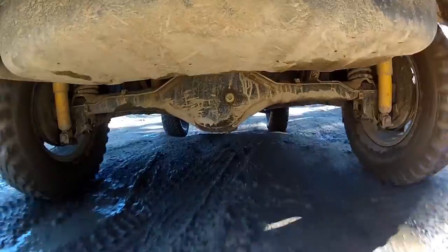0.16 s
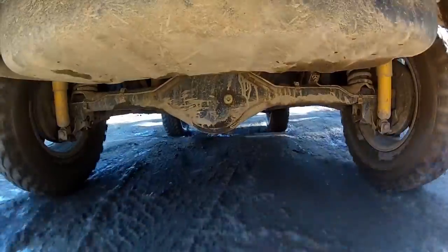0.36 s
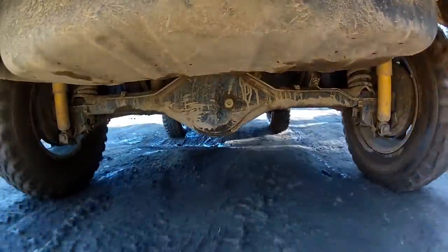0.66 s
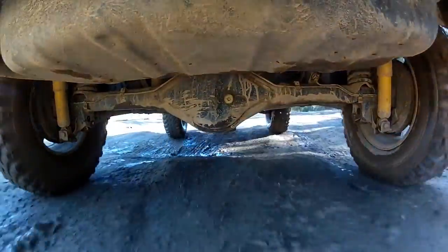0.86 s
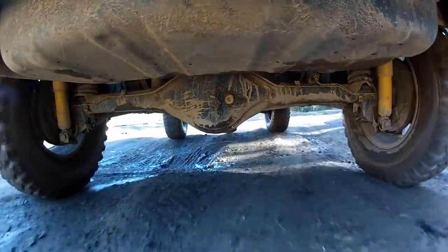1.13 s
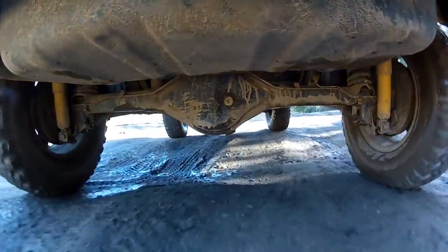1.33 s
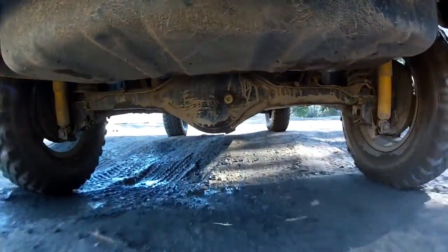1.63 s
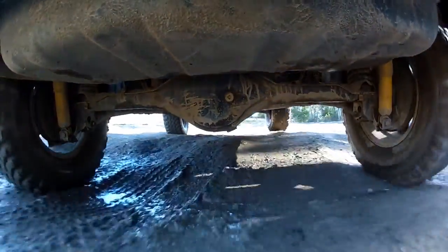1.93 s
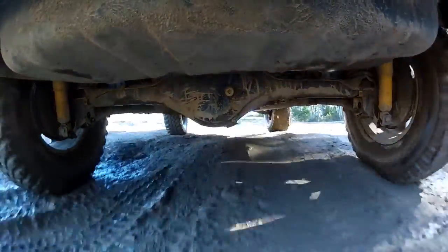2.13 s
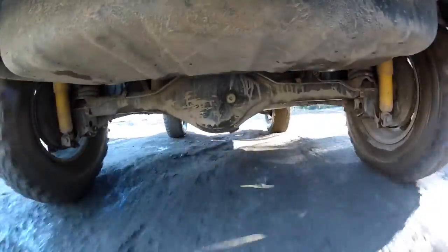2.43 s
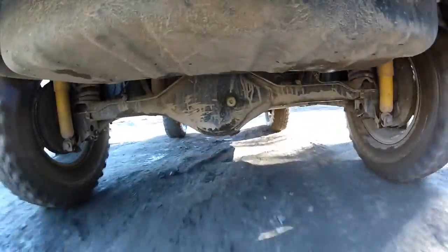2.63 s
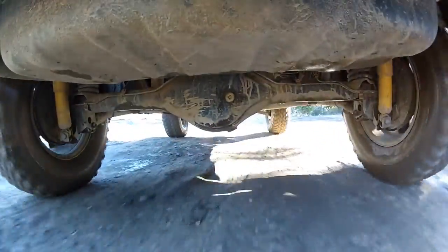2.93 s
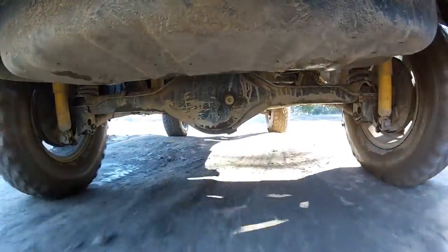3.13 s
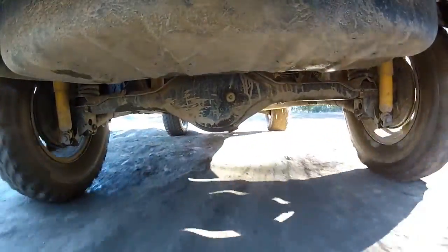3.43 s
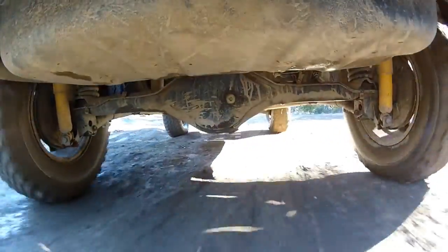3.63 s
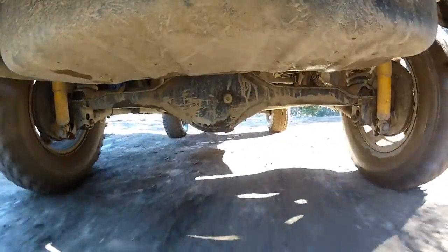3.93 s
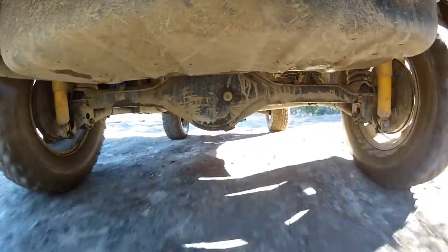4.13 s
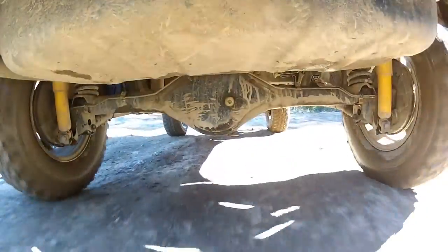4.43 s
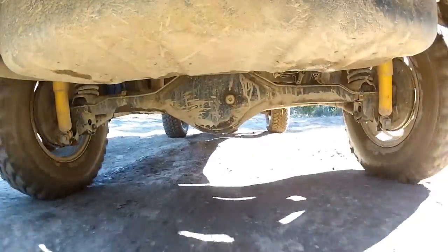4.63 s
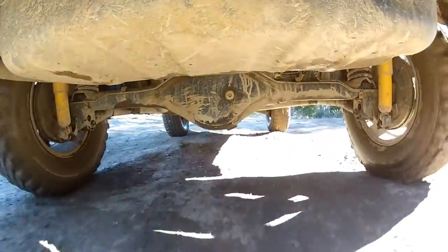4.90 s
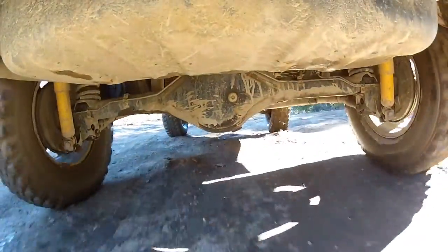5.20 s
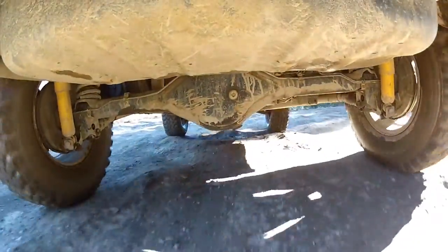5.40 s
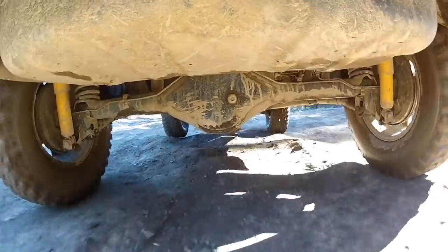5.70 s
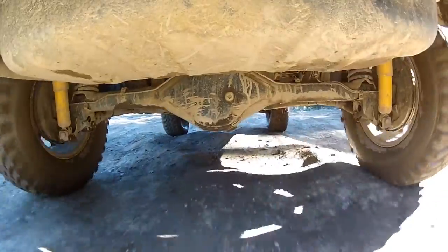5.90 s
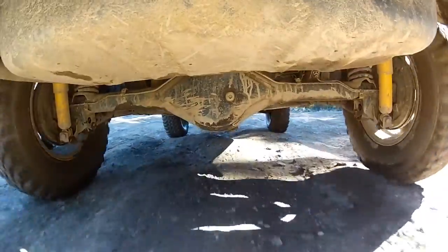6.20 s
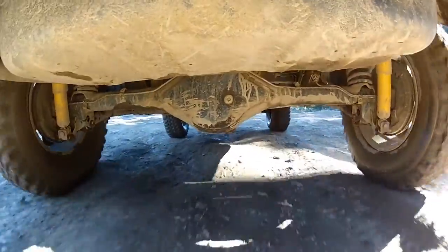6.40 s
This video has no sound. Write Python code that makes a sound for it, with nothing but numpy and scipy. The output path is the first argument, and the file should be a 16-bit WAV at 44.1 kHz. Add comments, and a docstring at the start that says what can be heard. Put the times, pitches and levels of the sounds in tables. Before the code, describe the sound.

A four-wheel-drive crawls over rough dirt, its chassis rumbling and thumping while loose parts knock and rattle right against the microphone.

```python
"""A four-wheel-drive's chassis shudders and thumps over rough dirt, heard by a camera clamped beneath it.
Most sound arrives through the mount: the bracket drones and rings with each jolt, and loose parts
knock, scrape and rattle on the camera case. Behind them the ground rumbles and grit hisses under the tyres.
The camera ducks and clips on hard hits; its 8 kHz sample-and-hold mirrors the sound up into the treble."""
import sys
import numpy as np
from scipy import signal
from scipy.io import wavfile

SR = 44100
rng = np.random.default_rng(int(sys.argv[2]) if len(sys.argv) > 2 else 0)


def file_out(sig):
    """Save sig as 16-bit WAV at sys.argv[1]."""
    # one column per channel
    cols = np.atleast_2d(sig).T
    # limit, then scale
    lim = np.clip(cols, -1, 1)
    pcm = np.round(lim * 32767).astype(np.int16)
    wavfile.write(sys.argv[1], SR, pcm)


N = 288855

# how hard the ground shakes the mount: (time [s], chassis level [dB], bracket level [dB])
SHUDDER = [(0.0, -18.5, -24), (0.16, -20.5, -21), (0.33, -18.5, -27.5), (0.54, -21, -37),
           (0.67, -22, -19.5), (0.95, -22.5, -30), (1.35, -23, -23.5), (1.51, -27, -27.5),
           (1.73, -24, -29.5), (2.08, -22.5, -25), (2.35, -24.5, -21.5), (2.85, -22.5, -29),
           (3.06, -22.5, -30.5), (3.43, -22, -20.5), (3.61, -34, -32), (3.81, -28.5, -34), (3.96, -19, -31),
           (4.19, -22, -28.5), (4.41, -25.5, -29), (4.63, -30, -28), (4.98, -20.5, -23.5),
           (5.8, -25.5, -27.5), (5.97, -24.5, -39), (6.18, -17.5, -23), (6.33, -22, -20),
           (6.55, -21.5, -18)]
# resonances of the camera case: (pitch [Hz], level [dB], t60 before choking [s])
CASE_MODES = [(293, 8, 0.06), (470, -0.5, 0.083), (590, 11, 0.062), (633, -2, 0.092), (820, 16, 0.025),
              (937.7, 0, 0.14), (1230, 4, 0.0078), (1722, -1, 0.031), (1580, 4, 0.039), (1800, 5, 0.038),
              (2570, 8, 0.012), (2597, -6.5, 0.062), (3600, -14, 0.044)]
# loose parts striking the case: (time [s], peak [dB], treble [dB], favoured ring [Hz])
KNOCKS = [(.071, -10, -5.5, 612), (.105, -16.5, -15, 606), (0.133, -14, -22, 550), (0.248, -12, -3, 680),
          (.569, -16.5, -2.5, 615), (0.624, -12.5, -46, 520), (.66, -10.5, -51, 617),
          (.682, -16.5, -10, 540), (.722, -11, -8, 666), (0.777, -10, -10, 674), (.787, -19, 1, 590),
          (.917, -17.5, -25, 880), (1.105, -21.5, -3, 782), (1.148, -12, -15, 1070),
          (1.274, -11.5, -38, 590), (1.299, -15, -16, 565), (1.344, -17.5, -5, 890),
          (1.421, -14.5, -7, 590), (1.436, -8, -33, 940), (1.467, -10, 2, 600), (1.507, -13, -21, 1500),
          (1.532, -14.5, 0.5, 606), (1.685, -22, -12, 610), (1.727, -12.5, -11.5, 553),
          (1.751, -15, -13.5, 1020), (1.779, -18, -28, 760), (1.833, -14, -11.5, 1250),
          (1.87, -18, -1, 606), (1.882, -13.5, -33, 645), (1.956, -11, -6, 580), (2.052, -8.5, -6, 810),
          (2.079, -13, -1, 600), (2.098, -8.5, -15, 930), (2.159, -2, -8.5, 790), (2.185, -13.5, -13, 470),
          (2.201, -14.5, -20, 634), (2.236, -12, -36, 600), (2.341, -15, -10, 620), (2.349, -8, -30, 590),
          (2.403, -17.5, -28, 590), (2.413, -15.5, -21, 980), (2.495, -15.5, -4.5, 616),
          (2.559, -10.5, -24, 1080), (2.566, -10, -15, 616), (2.587, -18.5, 4, 640), (2.64, -17, -19, 605),
          (2.677, -17.5, 11, 920), (2.799, -11, -34, 590), (3.039, -21, -23, 616), (3.142, -18, -29, 620),
          (3.211, -8.5, -15, 520), (3.239, -13.5, -6, 606), (3.272, -16, -21, 640),
          (3.316, -17.5, -25, 485), (3.353, -14, -16, 820), (3.363, -3, -23, 628), (3.377, -4, -45, 990),
          (3.409, -15, -42, 936), (3.423, -6.5, -55, 587), (3.448, -9.5, -12, 970),
          (3.505, -11.5, -33, 945), (3.523, -15, -22, 610), (3.567, -13, -34, 950), (3.588, -14, -6, 1620),
          (3.632, -14, -12, 616), (3.67, -14, -14, 940), (3.908, -25.5, 4, 960), (3.968, -19.5, -4.5, 850),
          (4.082, -9, -43, 590), (4.126, -14, -30, 664), (4.154, -14.5, -8, 620), (4.31, -6, -38, 530),
          (4.338, -11, -21, 930), (4.356, -16, -32, 610), (4.633, -14, -36, 623), (4.783, -21, -4, 604),
          (4.843, -11.5, -22, 596), (4.881, -4, -14.5, 610), (4.9, -10, -12, 740), (4.932, -15.5, -7, 920),
          (5.039, -13.5, -1, 1010), (5.065, -12, -7, 770), (5.088, -7, -14, 470), (5.107, -16.5, -14, 663),
          (5.222, -17, -19, 615), (5.262, -16, -6, 627), (5.319, -12, -41, 603), (5.366, -11.5, -37, 975),
          (5.398, -15.5, -15, 960), (5.455, -10.5, -2.5, 660), (5.505, -18, -3, 602),
          (5.636, -14.5, -1, 2570), (5.894, -13, -11, 590), (5.928, -8, -9, 590), (5.943, -2, -2.5, 790),
          (6.136, -13.5, -9, 696), (6.258, -6.5, -32.5, 582.4), (6.296, -9, -22, 600),
          (6.367, -16, -33, 930), (6.433, -5, -11.5, 635), (6.466, -10.5, -33, 976), (6.483, -2, -10, 890),
          (6.507, -8, -9, 920), (6.524, -11.5, -17, 590)]


def chassis_shudder():
    """Rough ground shakes the chassis and bumps heave it. Returns the sound and the shudder level in dB."""
    # bumps under the wheels: (time [s], peak [dB], pitch [Hz])
    bumps = [(0.008, -11.5, 46), (0.094, -2.5, 41.2), (0.161, -29, 38.0), (0.361, -15.5, 45),
             (0.785, -4.5, 53.3), (1.133, -3, 63.85), (1.302, -5.5, 71.9), (1.425, -4.5, 65.6),
             (1.47, -2.5, 53.4), (1.904, -5.5, 42.45), (1.938, -8.5, 69), (2.077, -6.5, 39.3),
             (2.158, -2.5, 33.5), (2.188, -2, 64.5), (2.228, -4, 29.18), (2.258, -4, 32), (3.245, -4, 53.0),
             (3.323, 1.5, 49.5), (3.36, -4, 79.96), (3.453, -15, 46.6), (3.526, -1.5, 51),
             (4.11, -4.5, 66.7), (4.144, -18, 44), (4.29, -1.5, 72.6), (4.657, -6, 44.3),
             (4.686, -16, 71.0), (4.811, -0.5, 64.0), (4.841, -2, 35.3), (4.934, -22, 55.7),
             (5.014, -6.5, 57.8), (5.056, 4, 49.8), (5.093, -6, 56.6), (5.267, -1.5, 45.7),
             (5.323, -6.5, 46.6), (5.465, -6.5, 47.4), (5.739, -10, 50.1), (5.898, -5.5, 45),
             (6.153, -22, 52), (6.288, -0.5, 46.1), (6.35, -10, 30.5), (6.385, -18, 50.0),
             (6.442, -14, 44.0), (6.466, -6, 32.2)]
    level_db = stirred(in_time(SHUDDER)[0], bumps, fade_s=.03, after_db=-16.5)
    shudder = from_db(level_db + 1) * shaken(hz=np.full(N, 38), width_hz=11.7)
    return shudder + swings(bumps, cycles=3.15, rise_cycles=.013), level_db


def bracket_drone():
    """The shaken bracket drones and jolts set it ringing. Returns the sound and the drone level in dB."""
    # jolts through the mount: (time [s], peak [dB], pitch [Hz])
    jolts = [(0.065, -21, 193), (0.129, -10, 181), (.521, -10.5, 149), (0.569, -19, 159),
             (.623, -15.5, 168), (0.659, -10.5, 164), (0.721, -16, 172), (0.921, -26, 188),
             (1.142, -12, 173), (1.268, -11.5, 152), (1.425, -11, 142), (1.465, -7.5, 219),
             (1.619, -20, 172), (1.696, -9, 164.3), (1.873, -11, 173), (1.934, -6.5, 141),
             (2.074, -6.5, 138), (2.154, -16, 180), (2.345, -8, 187), (2.399, -11, 173),
             (2.553, -11.5, 121), (2.635, -20, 147), (2.789, -10.5, 151), (3.134, -13.5, 145),
             (3.213, -11, 170), (3.357, -0.5, 152), (3.483, -9.5, 128), (3.558, -11, 147.9),
             (3.604, -5, 159.6), (3.772, -16, 91.1), (3.822, -15.5, 180), (4.01, -16.5, 163.3),
             (4.08, -7.5, 180), (4.254, -18, 93.5), (4.303, -7, 169), (4.375, -9.5, 160), (4.549, -13, 192),
             (4.688, -13, 133), (4.811, -29, 102.3), (4.85, -8.5, 196), (4.871, -7, 152),
             (4.934, -11, 92.6), (5.016, -5.5, 159), (5.056, -8, 165), (5.224, -11.5, 99.6),
             (5.361, -14, 177), (5.67, -15.5, 166), (5.748, -16, 172), (5.924, -12, 99), (5.922, -5.5, 174),
             (6.255, -5.5, 193), (6.364, -16, 183), (6.43, -8, 186), (6.472, -4.5, 145)]
    level_db = stirred(in_time(SHUDDER)[1], jolts, fade_s=.042, after_db=-10)
    pitch_hz = 174.1 * (1 + .08 * drift(rate_hz=4))
    drone = from_db(level_db - 1.5) * shaken(pitch_hz, width_hz=14)
    return drone + swings(jolts, cycles=14.5, rise_cycles=.34), level_db


def case_knocks(rattle_db):
    """Loose parts hit the case; lighter taps fall at random, crowding where the rattle is strong."""
    when, strength, dullness, place = rng.random((36, 4)).T
    activity = np.cumsum(from_db(rattle_db))
    tap_s = np.interp(when, activity / activity[-1], np.arange(N) / SR)
    taps = zip(tap_s, -19 - 4 * strength, -30 * dullness, np.where(place < .7, 605, 900))
    hits = [(*row, .006, 0) for row in [*KNOCKS, *taps]]  # 6 ms of chatter, no squeak
    return case_blows(hits, click=16, fade_power=1, choke=.57, favour_db=8, spread_db=3.5, detune=.029)


def case_scrapes():
    """Slams and scrapes on the case: contacts too fast to tell apart."""
    # (time [s], peak [dB], treble [dB], favoured ring [Hz], length [s], squeak share [0-1])
    scrapes = [(.990, -8, -5, 1880, .024, .24), (1.402, -6, -14, 1140, .015, .45),
               (6.316, -8, -3, 1330, .032, .12), (1.479, 8, -4, 1480, .006, .25),
               (3.607, 9, -4, 950, .010, .15)]
    return case_blows(scrapes, click=0, fade_power=4, choke=.3, favour_db=5, spread_db=1.5, detune=.02)


def case_blows(events, click, fade_power, choke, favour_db, spread_db, detune):
    """A first click and a burst of chatter ring the case, struck at another place each time."""
    hz, level_db, t60 = np.transpose(CASE_MODES)
    out, t = np.zeros(N + SR), np.arange(SR // 12) / SR
    luck = rng.standard_normal((len(events), 2 * len(hz) + len(t)))
    upper = np.clip(np.log2(hz / 950), 0, 1.3)  # only hard contacts reach the upper modes
    attack = np.minimum(t / .00066, 1)[:, None]
    decay = from_db(-60 * np.outer(t, 1 / (choke * t60)))
    for (s, peak_db, treble_db, favoured_hz, length_s, squeak), row in zip(events, luck):
        strength, shift, noise = np.split(row, [len(hz), 2 * len(hz)])
        near = np.exp(-(np.log(hz / favoured_hz) / .21) ** 2)  # the spot struck favours nearby modes
        gain = from_db(level_db + favour_db * near + upper * (treble_db + 7.5) + spread_db * strength)
        modes = np.sin(2 * np.pi * np.outer(t, hz * (1 + detune * shift))) * decay * attack
        pressure = np.exp(-(t / length_s) ** fade_power)
        body = signal.fftconvolve(modes @ gain, noise * pressure + click * (t == 0))[:len(t)]
        # a sliding contact locks to one pitch and squeaks while it is pressed
        waver = np.cumsum(noise) * .045
        tone = np.sin(2 * np.pi * favoured_hz * t + waver) * pressure * np.minimum(t / .00095, 1)
        blow = (1 - squeak) * body / np.abs(body).max() + squeak * tone
        out[round(s * SR):][:len(t)] += from_db(peak_db) * blow
    return out[:N]


def rattle_level():
    """How lively the loose parts are, in dB; every listed knock stirs them up."""
    # underlying rattle: (time [s], level [dB])
    looseness = [(0, -41), (.42, -47), (.7, -36.5), (.88, -45), (1.32, -35), (1.39, -48), (1.7, -36),
                 (1.9, -40.5), (2.02, -50), (2.25, -33), (2.55, -35), (2.72, -42), (2.85, -35), (2.98, -47),
                 (3.36, -31), (3.58, -32), (3.8, -41), (4.12, -38.5), (4.21, -50), (4.35, -32),
                 (4.5, -46.5), (4.8, -41), (5.06, -31), (5.15, -45), (5.3, -34.5), (5.46, -34), (5.6, -48),
                 (5.86, -48), (5.93, -33.5), (6.07, -46.5), (6.27, -34), (6.55, -31.5)]
    return stirred(in_time(looseness)[0], KNOCKS, fade_s=.033, after_db=-23)


def case_rattle(level_db):
    """Small soft taps at random; each mode of the case answers as a close pair."""
    taps = grains(per_s=280, spread_db=3.2) * from_db(level_db - 36)
    taps = signal.sosfilt(signal.butter(2, 1300, fs=SR, output="sos"), taps)
    pairs = [(hz * side, mode_db, t60) for hz, mode_db, t60 in CASE_MODES for side in (.97, 1.03)]
    couplings = rng.standard_normal((len(pairs), N // 400 + 1))
    couplings = np.repeat(couplings, 400, axis=1)[:, :N]  # the taps land now here, now there
    return sum(from_db(mode_db) * ring(taps * coupling, hz, .41 * t60)
               for (hz, mode_db, t60), coupling in zip(pairs, couplings))


def ground_rumble(chassis_db, bracket_db):
    """A broad rumble fills in between the resonances, swelling with chassis and bracket."""
    # rumble colour: (frequency [Hz], relative level [dB])
    spectrum = [(10, -29), (18, -20), (45, 3.5), (115, -5.5), (200, -2), (300, -38.5), (390, -29),
                (700, -64)]
    noise = rng.standard_normal((2, N))
    return from_db((chassis_db + bracket_db) / 2 + 1) * coloured(noise, spectrum, flicker_hz=20.3)


def tyre_grit(chassis_db):
    """Grit hisses under the tyres, gently following the shudder; once, loose dirt slides past."""
    # grit colour: (frequency [Hz], relative level [dB])
    spectrum = [(300, -4), (600, 8), (1000, -4), (1370, -37), (1980, -1.5), (2600, -15), (3020, -7.5),
                (3560, -7.5)]
    # bright swell of sliding dirt: (time [s], level [dB])
    slide_swell = [(1.89, -55), (1.93, -34.5), (2.12, -38.5), (2.19, -51)]
    crunch = [grains(per_s=2500, spread_db=1) for _ in range(2)]
    grit_db = -41 + .24 * (chassis_db - chassis_db.mean())
    grit = from_db(grit_db) * coloured(crunch, spectrum, flicker_hz=17.6)
    slide = signal.sosfilt(signal.butter(2, [2100, 3600], "band", fs=SR, output="sos"), crunch[1])
    return grit + from_db(in_time(slide_swell)[0]) * rms_one(slide)


def shaken(hz, width_hz):
    """A resonance driven by random force: a sine whose height and phase wander; rms 1."""
    wander = drift(width_hz) + 1j * drift(width_hz)
    return rms_one(np.real(wander * np.exp(2j * np.pi * np.cumsum(hz) / SR)))


def swings(events, cycles, rise_cycles):
    """Each blow swings the part upward first, then it dies away by 60 dB over the given cycles."""
    out, t = np.zeros(N + SR), np.arange(SR // 4) / SR
    for s, peak_db, hz in events:
        attack = 1 - np.exp(-t * hz / rise_cycles)
        swing = np.sin(2 * np.pi * hz * t) * from_db(-60 * t * hz / cycles) * attack
        out[round(s * SR):][:len(t)] += from_db(peak_db) * swing / swing.max()
    return out[:N]


def stirred(level_db, events, fade_s, after_db):
    """A struck part goes on shaking: each blow adds a tail to its level, after_db relative to the peak."""
    kicks = np.zeros(N)
    for s, peak_db, *_ in events:
        kicks[round(s * SR)] = from_db(peak_db + after_db) * fade_s * SR
    return 20 * np.log10(from_db(level_db) + smoothed(kicks, fade_s))


def ring(force, hz, t60):
    """One mode: a unit click sets a sine of height 1 ringing."""
    r, w = from_db(-60 / (t60 * SR)), 2 * np.pi * hz / SR
    return signal.lfilter([0, np.sin(w)], [1, -2 * r * np.cos(w), r * r], force + 1e-18)


def coloured(sources, spectrum, flicker_hz, flicker_db=3):
    """Half-octave bands of two flat sources in turn, each band with its own level and flicker; rms 1."""
    hz, level_db = np.transpose(spectrum)
    out, edges = 0, hz[0] * 2 ** np.arange(0, np.log2(hz[-1] / hz[0]) + .5, .5)
    for k, (low, high) in enumerate(zip(edges, edges[1:])):
        band = signal.sosfilt(signal.butter(2, [low, high], "band", fs=SR, output="sos"), sources[k % 2])
        centre_db = np.interp(np.log(low * high) / 2, np.log(hz), level_db)
        out = out + band * from_db(centre_db + flicker_db * drift(flicker_hz))
    return rms_one(out)


def grains(per_s, spread_db):
    """Random clicks, many small and few large; rms 1."""
    sizes = from_db(spread_db * np.minimum(rng.exponential(1, N), 4)) * rng.choice([-1, 1], N)
    return rms_one(sizes * (rng.random(N) < per_s / SR))


def drift(rate_hz):
    """Slow random wander: noise twice through a one-pole low-pass; rms 1."""
    r = np.exp(-2 * np.pi * rate_hz / SR)
    return rms_one(signal.lfilter([1], [1, -2 * r, r * r], rng.standard_normal(N + SR))[SR:])


def smoothed(x, seconds):
    """One-pole smoothing with unit area."""
    r = np.exp(-1 / (seconds * SR))
    return signal.lfilter([1 - r], [1, -r], x + 1e-18)


def in_time(rows):
    """Columns of an automation table, one value a sample."""
    s, *columns = np.transpose(rows)
    return [np.interp(np.arange(N) / SR, s, column) for column in columns]


def from_db(db):
    """Decibels to gain."""
    return 10 ** (np.asarray(db) / 20)


def rms_one(x):
    """Scale to rms 1."""
    return x / np.sqrt(np.mean(np.abs(x) ** 2) + 1e-20)


def scene():
    """All paths meet at the microphone, in mono."""
    chassis, chassis_db = chassis_shudder()
    bracket, bracket_db = bracket_drone()
    ground = ground_rumble(chassis_db, bracket_db) + tyre_grit(chassis_db)
    rattle_db = rattle_level()
    loose_parts = case_knocks(rattle_db) + case_scrapes() + case_rattle(rattle_db)
    return (chassis + bracket + loose_parts + ground)[None]


def record(dry):
    """The camera's sound: anti-alias filter, gain control, hard clipping, sample-and-hold, top cut."""
    hold_hz, hold_steps = 8000, 6
    threshold, duck_db_per_excess, lag_s = 1.0, 1500, .033
    band = signal.sosfilt(signal.cheby2(10, 45, 4200, fs=SR, output="sos"), dry)
    band = signal.sosfilt(signal.butter(1, 8, "high", fs=SR, output="sos"), band)
    # overload above 400 Hz pulls the gain down; it creeps back
    sidechain = signal.sosfilt(signal.butter(2, 400, "high", fs=SR, output="sos"), band)
    excess = np.clip(np.abs(sidechain) - threshold, 0, None)
    for _ in range(3):
        excess = smoothed(excess, lag_s)
    ducked = band * from_db(-duck_db_per_excess * excess)
    samples = np.clip(signal.resample_poly(ducked, hold_hz, SR, axis=1), -.95, .95)
    stairs = np.repeat(samples, hold_steps, axis=1)  # steps leave mirror images around 8 and 16 kHz
    wet = signal.resample_poly(stairs, SR, hold_hz * hold_steps, axis=1)[:, :N]
    wet = np.clip(wet, -.94, .94)
    return signal.sosfilt(signal.cheby2(14, 50, 15300, fs=SR, output="sos"), wet)


dry = scene()
out = record(dry)
file_out(out)
```